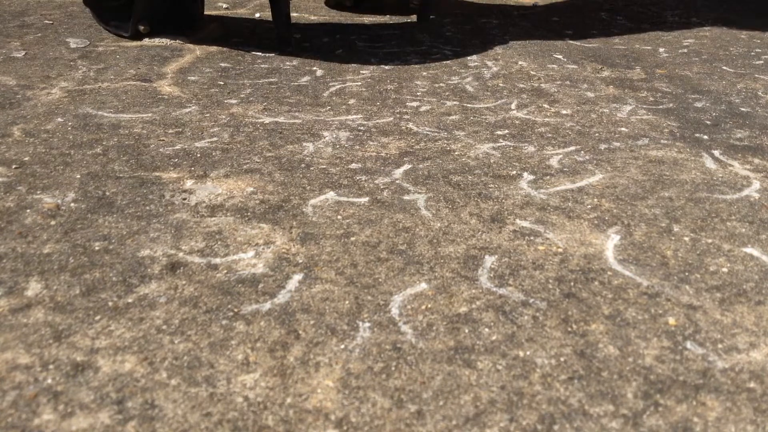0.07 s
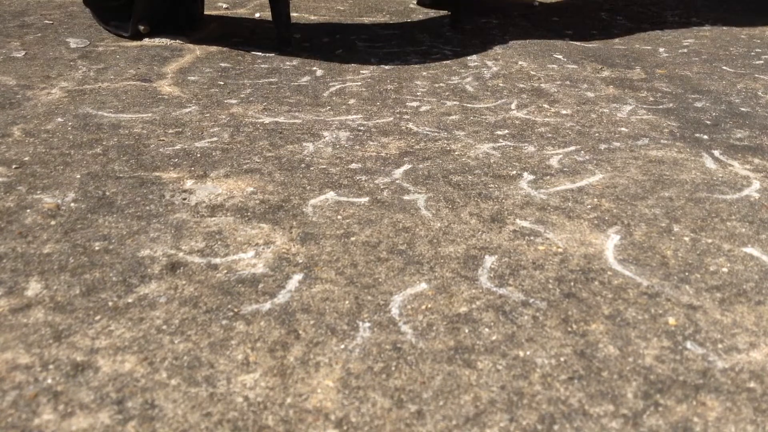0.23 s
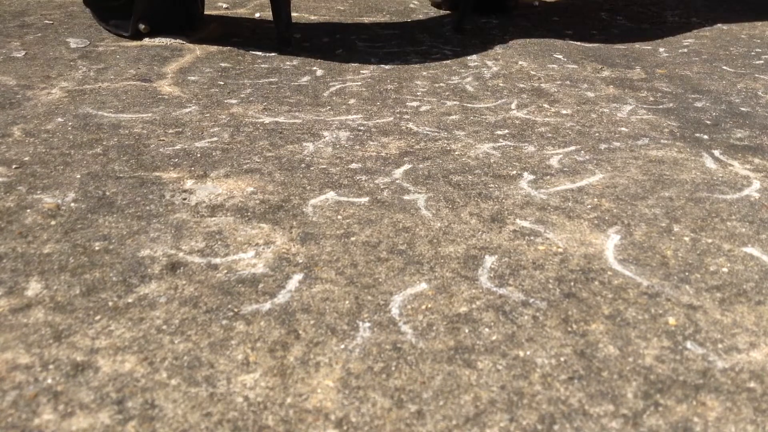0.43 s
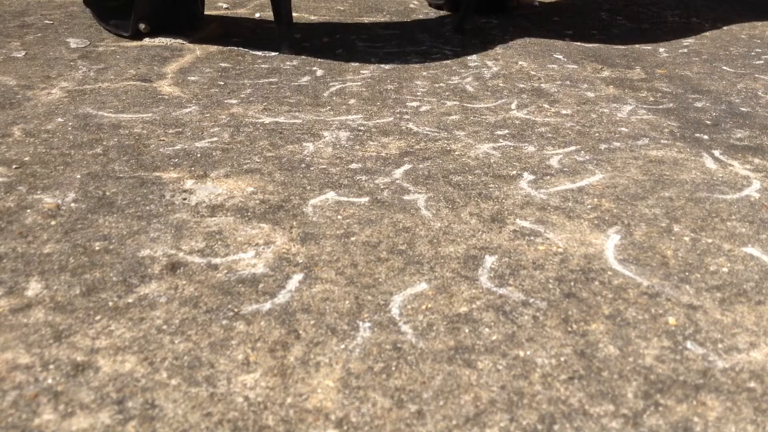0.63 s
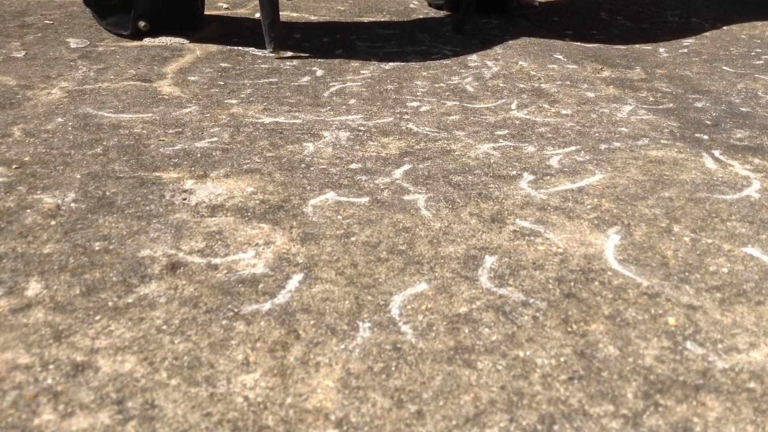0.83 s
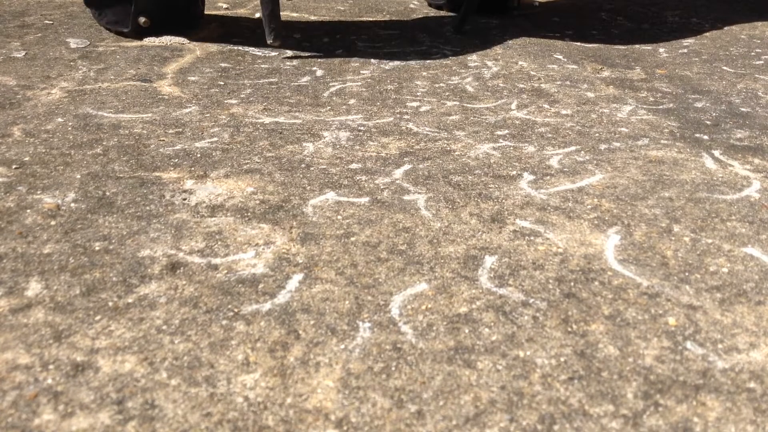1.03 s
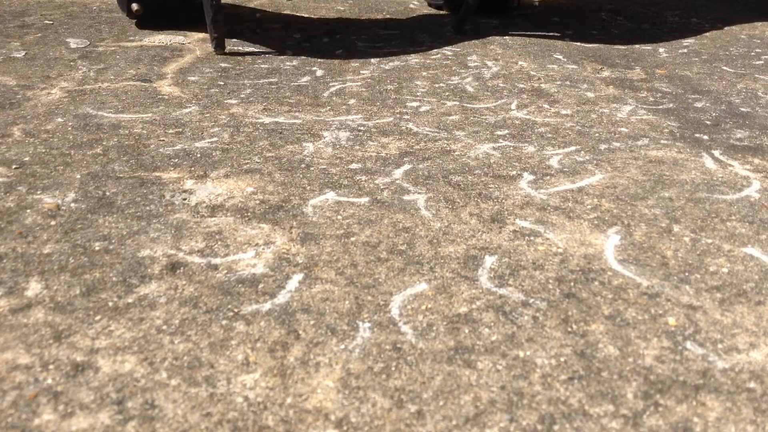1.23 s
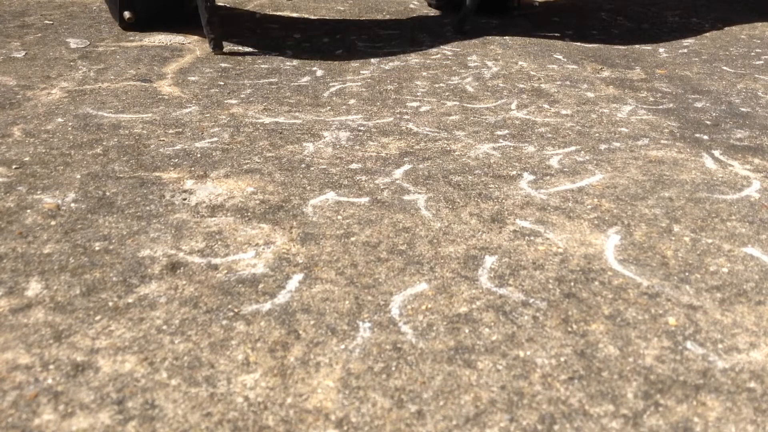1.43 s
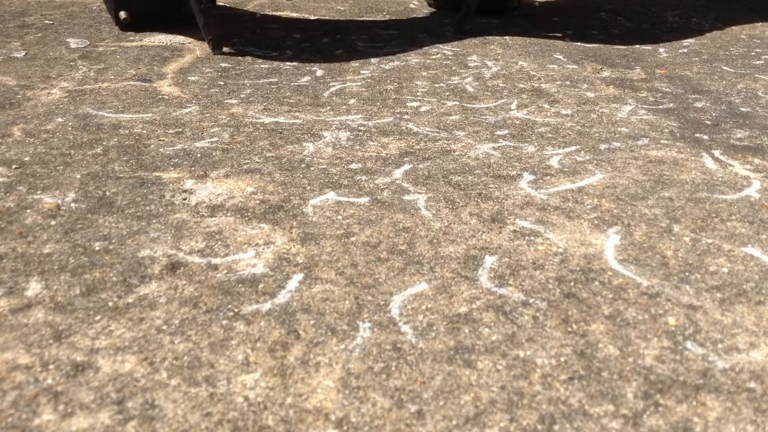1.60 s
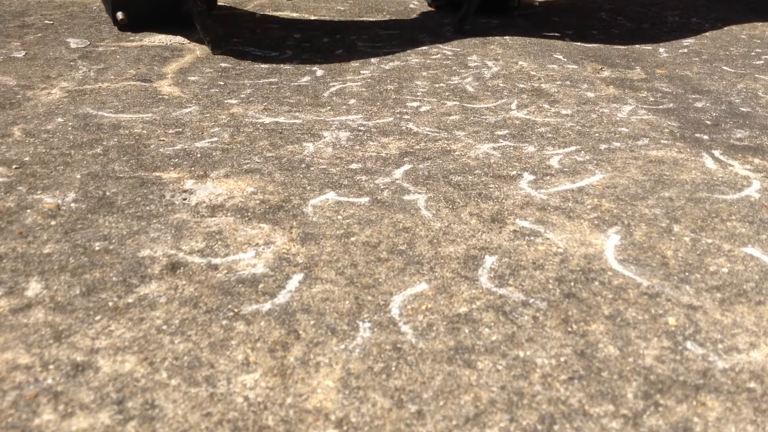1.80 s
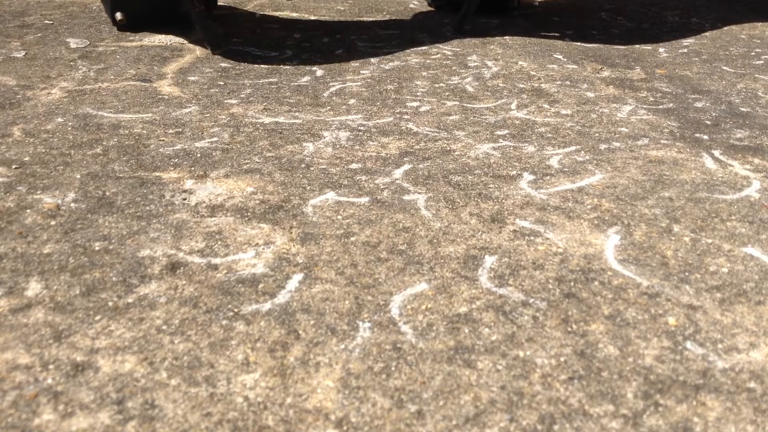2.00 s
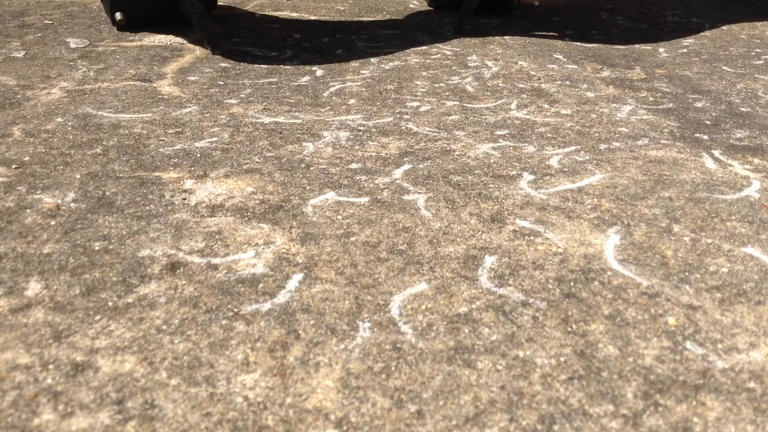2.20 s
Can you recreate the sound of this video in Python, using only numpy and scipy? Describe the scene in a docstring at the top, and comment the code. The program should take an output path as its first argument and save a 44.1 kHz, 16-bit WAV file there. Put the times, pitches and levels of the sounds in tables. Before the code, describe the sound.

Nailed boot heels scrape and crunch grit on rough stone, close by outdoors.

```python
"""Nailed boot heels on rough stone

Worn boot heels with bare nails shift on stone, outdoors and close by. A nail knocks, scrapes and
judders across the rock; then the heel comes down and grinds grit under it. Grains crack one by one,
the boots thud softly as the weight moves, and a low outdoor rumble lies beneath."""
import sys
import numpy as np
from scipy import signal
from scipy.fft import rfft, irfft, next_fast_len
from scipy.io import wavfile
from scipy.ndimage import uniform_filter1d

SR = 44100
rng = np.random.default_rng(int(sys.argv[2]) if len(sys.argv) > 2 else 0)


def generate_wav(sig):
    """Save sig (samples, or channels by samples) to the path in sys.argv[1] as 16-bit PCM at SR."""
    pcm = np.round(np.clip(np.atleast_2d(sig).T, -1, 1) * 32767).astype(np.int16)
    wavfile.write(sys.argv[1], SR, pcm)


N = 103635

# midrange rasp of a nail on stone (frequency [Hz], gain [dB])
RASP_EQ = [(200, -30), (470, -15), (830, 1), (1400, -8), (2400, 1), (3400, -0.5), (4400, 0.5), (6000, -1),
           (8000, -7), (10000, -12), (15000, -33)]
# bright hiss on top of the scrape (frequency [Hz], gain [dB])
HISS_EQ = [(1000, -9), (4000, -44), (7000, 7), (7700, -9), (8550, 9), (9800, -5.5), (11700, 4),
           (13200, 4.5), (14500, 5), (16000, 5.5)]
# hollow tone of the heel block (frequency [Hz], gain [dB])
HEEL_EQ = [(100, -38.5), (330, -23), (560, -2), (800, 0), (1050, 0), (1600, -7.5), (2200, -22.5),
           (5000, -63.5)]
# brittle top end of a chipping grain (frequency [Hz], gain [dB])
CHIP_EQ = [(300, -11), (1500, -22), (4000, 1), (7000, 14.5), (8600, 6.5), (10200, 3.5), (12000, 10.5),
           (15000, 0)]


def nail_skids():
    """The nail slips and bites: short swells of dense grains, ringing lower through the long slide."""
    # (peak time [s], 20 dB rise [s], 20 dB fall [s], rasp [dB], hiss [dB], ring pitch [Hz], ring [dB])
    skids = [(0.2447, .001, 0.014, -51, -40, 4200, -38), (0.4107, 0.0032, 0.0031, -23, -21.5, 3180, -36),
             (0.635, 0.0035, 0.0038, -21.5, -15, 2880, -23.5), (0.6654, 0.011, 0.0076, -18, -22, 2970, -24),
             (0.7056, 0.013, 0.014, -24, -25, 2660, -30.5), (.7360, 0.004, 0.017, -21, -23, 2420, -32),
             (0.743, .004, 0.016, -30, -35, 2300, -28.5), (.7630, 0.0069, 0.013, -34, -31, 2080, -35),
             (0.7704, 0.0034, 0.0081, -38, -23.5, 1980, -25.5),
             (0.7842, 0.0032, 0.017, -32.5, -40, 2160, -32.5),
             (1.3074, 0.0043, 0.0089, -27.5, -33, 3610, -25.5),
             (2.0690, 0.00067, 0.0032, -42, -50, 4070, -25.5)]
    overtone_ratio, overtone_db = 1.5, -9.5
    out, t = np.zeros(N), np.arange(N) / SR
    rasp, hiss = (steady(colour(grains(per_s=7500, spread_db=7), eq)) for eq in (RASP_EQ, HISS_EQ))
    for peak, rise, fall, rasp_db, hiss_db, ring_hz, ring_db in skids:
        swell = amp(-20 * np.maximum((peak - t) / rise, (t - peak) / fall).clip(0, 10))
        ring = nail_ring(ring_hz) + amp(overtone_db) * nail_ring(ring_hz * overtone_ratio)
        out += swell * (amp(rasp_db) * rasp + amp(hiss_db) * hiss + amp(ring_db) * ring)
    return out


def nail_ring(hz, width_hz=300):
    """One resonance of the nail, kept going by friction."""
    resonance = signal.iirpeak(hz, hz / width_hz, SR)
    return steady(signal.lfilter(*resonance, rng.standard_normal(N)))


def nail_drag():
    """Fine grains under the sliding nail: rasp, hiss and heel drone share one uneven pressure."""
    # fader moves of the scrape (time [s], rasp [dB], hiss [dB], heel drone [dB])
    faders = [(0, -66, -59, -62), (0.037, -54, -41, -64), (.08, -73, -71, -64.5), (.275, -80, -75, -60.5),
              (.285, -61, -51, -47), (0.398, -56.5, -60, -60), (.415, -41.5, -37, -39.5),
              (0.446, -42, -42.5, -43), (0.502, -58.5, -58, -56), (.628, -64, -63, -63),
              (.64, -38, -39, -38), (0.658, -39, -28.5, -39), (.688, -46.5, -44, -37.5),
              (.725, -43, -41, -45), (.757, -43, -53, -50), (0.794, -47, -61, -39), (.815, -55.5, -66, -52),
              (.89, -67.5, -64, -61), (1.02, -64, -64, -69), (1.055, -51.5, -57, -57),
              (1.085, -65.5, -75, -71), (1.297, -74, -87, -84), (1.317, -59, -77, -47),
              (1.358, -48.5, -44, -47), (1.417, -69.5, -77, -57.5), (1.453, -46, -49, -42.5),
              (1.485, -75, -72, -71), (1.55, -54.5, -66, -54), (1.558, -34, -41, -46),
              (1.585, -33.5, -51, -56), (1.62, -44.5, -46, -69), (1.682, -38, -43.5, -45),
              (1.741, -44.5, -50, -56), (1.77, -39, -42, -47), (1.805, -57.5, -57, -56.5),
              (1.88, -61.5, -61, -66), (1.94, -66, -68, -63), (2.005, -64, -66, -62),
              (2.012, -52, -68, -68), (2.05, -45, -44, -50), (2.09, -53, -54, -61),
              (2.13, -66.5, -74, -64.5), (2.28, -72, -70, -59.5), (2.35, -55.5, -55, -57.5)]
    pressure = flutter(depth_db=2.3, size=150)
    return sum(amp(db) * unit(pressure * colour(grains(per_s=6000, spread_db=6.5), eq))
               for db, eq in zip(automation(faders), (RASP_EQ, HISS_EQ, HEEL_EQ)))


def grit_cracks(size=900):
    """Each grain gives a dull crunch and a bright chip; big ones snap cleanly, small ones crumble."""
    # grains cracking under a nail (time [s], relative crunch level [dB], relative chip level [dB])
    cracks = [(0.0901, -49.5, -45.5), (0.282, -39.5, -45), (0.293, -43, -39.5), (0.3186, -48, -45),
              (0.3234, -43, -45), (0.3473, -47, -43), (0.4348, -34, -31), (0.4438, -40.5, -35),
              (0.462, -35, -44), (0.5363, -52, -43), (0.5601, -46, -41.5), (0.625, -48, -40),
              (0.6327, -31, -32), (0.636, -17.5, -24), (0.9414, -48.5, -42.5), (1.036, -49, -50),
              (1.0448, -37.5, -41), (1.1179, -47.5, -52), (1.4428, -35.5, -52), (1.4499, -28, -49),
              (1.4996, -50, -44), (1.5265, -40.5, -34.5), (1.5538, -29.5, -54), (1.5607, -31.5, -41),
              (1.5656, -29.5, -44), (1.5730, -20, -42), (1.5764, -28, -43), (1.594, -29.5, -31),
              (1.5972, -40, -43), (1.6293, -30, -30.5), (1.6348, -24.5, -56), (1.6374, -38, -42),
              (1.6494, -34, -46), (1.6764, -28, -49), (1.6832, -33.5, -44), (1.6855, -28.5, -46),
              (1.6874, -32.5, -47), (1.6999, -25.5, -50), (1.7139, -33, -37), (1.7481, -30, -35),
              (1.7558, -30, -35), (1.763, -25, -36), (1.7802, -33, -39), (1.8443, -43, -40.5),
              (1.876, -43, -40), (1.8814, -41.5, -41), (1.8875, -41, -43.5), (2.0062, -27.5, -45),
              (2.0338, -46, -34.5), (2.0356, -31.5, -33), (2.0685, -36.5, -36), (2.194, -53.5, -50.5),
              (2.3195, -47.5, -48.5)]
    # the duller part of a crack (frequency [Hz], gain [dB])
    crunch_eq = [(150, -15.5), (600, -7.5), (1500, -3.5), (2500, -1.5), (3600, 3.5), (5200, -4.5),
                 (7500, -10.5), (10000, -36), (15000, -58)]
    crunch_gain_db, chip_gain_db, pitch_scatter = 20.5, 19, 0.088
    snap_above_db, crumble_db_per_db, crumble_t60_s = -28, 0.4, 0.015
    out, t = np.zeros(N), np.arange(size) / SR
    for start, crunch_db, chip_db in cracks:
        crumble = amp(crumble_db_per_db * (snap_above_db - crunch_db))
        for eq, db in ((crunch_eq, crunch_db + crunch_gain_db), (CHIP_EQ, chip_db + chip_gain_db)):
            force = rng.standard_normal(size) * amp(-60 * t / crumble_t60_s)
            force *= crumble / np.linalg.norm(force)
            force[0] += rng.choice([-1, 1])  # the snap
            crack = colour(force, eq, ratio=np.exp(pitch_scatter * rng.standard_normal()))
            add(out, start, amp(db) * crack / np.linalg.norm(crack))
    return out


def heel_knocks(size=4000):
    """The heel block answers each blow with a short hollow ring and a noisy rattle."""
    # blows to the heel (time [s], level [dB], pitch [ratio], 60 dB decay [s])
    blows = [(0.2453, -23, 1.014, 0.025), (0.4107, -33.5, 1.1, 0.026), (0.429, -36.5, 1.18, 0.014),
             (.4345, -32, 0.97, 0.024), (.4435, -34.5, 1.1, 0.027), (0.4696, -31, 0.77, 0.022),
             (0.5822, -39, 0.83, 0.013), (.6350, -25, 0.836, 0.022), (0.6671, -27.5, 0.87, 0.047),
             (0.708, -27, 1.1, 0.032), (0.7417, -26, 1.02, 0.036), (0.7697, -27.5, 1.06, 0.038),
             (1.3008, -20.5, 1, 0.031), (1.3069, -26.5, 0.98, 0.048), (1.331, -38, 0.97, 0.073),
             (1.354, -28.5, 1.04, 0.021), (1.4315, -34.5, 0.69, 0.014), (1.4492, -36.5, 0.67, 0.044),
             (1.5727, -29, 1.94, 0.0083), (1.7475, -28.5, 1.35, 0.0099), (2.0688, -41.5, 0.92, 0.017)]
    # modes of the block (base frequency [Hz], relative level [dB], decay [ratio to the blow's])
    modes = [(370, -22.5, 0.58), (499, -8, 1.46), (690, -7, 1.4), (803, 3, 0.93), (931, -11, 2.2),
             (1190, -6.5, 0.84), (1520, -10.5, 1.3)]
    ring_db, rattle_db, attack_s = 1, -4.5, 0.00019
    out, t = np.zeros(N), np.arange(size) / SR
    attack = 1 - np.exp(-t / attack_s)
    for start, db, pitch, t60 in blows:
        ring = np.zeros(size)
        for hz, mode_db, decay_ratio in modes:
            decay = amp(mode_db + rng.normal(0, 1) - 60 * t / (t60 * decay_ratio))
            ring += decay * np.sin(2 * np.pi * hz * pitch * t)
        rattle = steady(colour(rng.standard_normal(size), HEEL_EQ, pitch)) * amp(-60 * t / t60)
        add(out, start, amp(db) * attack * (amp(ring_db) * ring + amp(rattle_db) * rattle))
    return out


def boot_thuds(size=6000):
    """Each shift of weight gives a few soft low cycles that start tight and sag in pitch."""
    # shifts of weight (time [s], relative level [dB], settled pitch [Hz], 60 dB decay [s])
    thuds = [(0.116, -23.5, 142, 0.03), (.125, -30.5, 246, 0.04), (0.186, -19.5, 190, 0.021),
             (.222, -34.5, 219, 0.036), (0.975, -24.5, 185.6, 0.057), (1.013, -37, 141, 0.062),
             (1.082, -36, 171, 0.068), (1.340, -28, 184, 0.062), (1.455, -38, 162, 0.068),
             (1.809, -31.5, 172, 0.062)]
    attack_s, pitch_lift, relax_s = 0.0023, 0.41, 0.003
    out, t = np.zeros(N), np.arange(size) / SR
    attack = (1 - np.exp(-t / attack_s)) ** 2
    for start, db, hz, t60 in thuds:
        cycles = np.cumsum(hz * (1 + pitch_lift * np.exp(-t / relax_s))) / SR
        add(out, start, 2 * amp(db - 60 * t / t60) * attack * np.sin(2 * np.pi * cycles))
    return out


def nail_sing(start_s=0.28, end_s=0.42, level_db=-62.5):
    """A thin, chattering ring while the nail barely touches the stone."""
    t = np.arange(N) / SR
    touch = uniform_filter1d(1. * ((t > start_s) & (t < end_s)), size=500)
    chatter = unit(flutter(depth_db=10, size=200))
    return amp(level_db) * touch * chatter * nail_ring(hz=6660)


def sand_ticks(level_db=-73):
    """Sparse faint ticks of sand under the soles."""
    return amp(level_db) * unit(colour(grains(per_s=97, spread_db=7), CHIP_EQ))


def boot_body(scrape, t60_s=0.013, tail_db=-7.5, size=1200):
    """Many short resonances of nail and boot ripple the spectrum of the scraping."""
    response = rng.standard_normal(size) * amp(-60 * np.arange(size) / SR / t60_s)
    response *= amp(tail_db) / np.linalg.norm(response)
    response[0] = 1  # the direct sound
    return signal.fftconvolve(scrape, response / np.linalg.norm(response))[:N]


def echo(x, predelay_s=0.006):
    """Scatter from the surroundings: a short tail that lingers longest in the mids."""
    # length of the tail (frequency [Hz], 60 dB decay [s])
    decay_times = [(200, 0.18), (900, 0.28), (3000, 0.17), (12000, 0.092)]
    hz, t, bands = signal.stft(rng.standard_normal(SR // 2), SR, nperseg=256)
    decay = amp(-60 * t / along(decay_times, hz)[:, None])
    _, tail = signal.istft(bands * decay, SR, nperseg=256)
    out = np.zeros(N)
    add(out, predelay_s, signal.fftconvolve(x, tail / np.linalg.norm(tail)))
    return out


def outdoor_air(hiss_db=-67.5):
    """A bed of slowly swelling low rumble and faint steady hiss."""
    # tone of the rumble (frequency [Hz], gain [dB])
    rumble_eq = [(25, -18), (60, -13.5), (110, -1.5), (175, 0.5), (300, -7.5), (700, -14.5), (1300, -19),
                 (2500, -38), (8000, -64)]
    # fader moves of the rumble (time [s], level [dB])
    rumble_fader = [(0, -53), (.4, -55.5), (.85, -52), (1.1, -50.5), (1.45, -49.5), (1.7, -54),
                    (1.97, -53.5), (2.15, -52), (2.35, -61)]
    # tone of the hiss (frequency [Hz], gain [dB])
    air_eq = [(500, 1), (3000, 1), (7000, -6.5), (15000, -7)]
    rumble_db, = automation(rumble_fader)
    rumble, hiss = (unit(colour(rng.standard_normal(N), eq, size=8192)) for eq in (rumble_eq, air_eq))
    return amp(rumble_db) * rumble + amp(hiss_db) * hiss


def grains(per_s, spread_db):
    """A stream of tiny impacts of uneven size."""
    hits = rng.random(N) < per_s / SR
    polarity = rng.choice([-1, 1], N)
    return hits * polarity * amp(spread_db * np.clip(rng.standard_normal(N), -2, 2))


def flutter(depth_db, size):
    """A randomly wavering gain, smoothed over size samples."""
    return amp(depth_db * unit(uniform_filter1d(rng.standard_normal(N), size)))


def colour(x, eq, ratio=1, size=1024):
    """Minimum-phase filter following an EQ curve, its pitch scaled by ratio."""
    hz = np.fft.rfftfreq(size, 1 / SR)
    cepstrum = irfft(np.log(amp(along(eq, hz / ratio))))
    cepstrum[1:size // 2] *= 2  # folding makes the filter causal
    cepstrum[size // 2 + 1:] = 0
    return signal.fftconvolve(x, irfft(np.exp(rfft(cepstrum))))[:len(x)]


def steady(x, size=300):
    """Even out a texture to rms 1 over a few milliseconds."""
    return x / np.sqrt(np.abs(uniform_filter1d(x ** 2, size)) + 1e-12)


def amp(db):
    """Decibels to gain."""
    return 10 ** (np.asarray(db) / 20)


def unit(x):
    """Scale to rms 1."""
    return x / np.sqrt(np.mean(x ** 2) + 1e-20)


def along(points, hz):
    """Read (frequency [Hz], value) points on a log frequency axis."""
    freqs, values = np.transpose(points)
    return np.interp(np.log(hz + 1), np.log(freqs + 1), values)


def automation(rows):
    """One curve, sample by sample, for each column after the time."""
    times, *columns = np.transpose(rows)
    return [np.interp(np.arange(N) / SR, times, column) for column in columns]


def add(track, start_s, sound):
    """Mix a sound in at start_s."""
    i = max(0, round(start_s * SR))
    track[i:i + len(sound)] += sound[:max(0, len(track) - i)]


def scene(echo_db=-16.5):
    """The boots, their weak echo and the open air, in mono."""
    boots = grit_cracks() + boot_body(nail_skids() + nail_drag() + sand_ticks())
    boots += nail_sing() + heel_knocks() + boot_thuds()
    return (boots + amp(echo_db) * echo(boots) + outdoor_air())[None]


def record(dry):
    """The recorder thins the deep bass and keeps nothing above its band limit."""
    low_cut_hz, top_hz = 119, 15450
    size = next_fast_len(N + SR // 2)
    thinned = signal.sosfilt(signal.butter(1, low_cut_hz, "highpass", fs=SR, output="sos"), dry)
    high_cut = 1 / (1 + (np.fft.rfftfreq(size, 1 / SR) / top_hz) ** 130)
    return irfft(rfft(thinned, size) * high_cut, size)[..., :N]


dry = scene()
out = record(dry)
generate_wav(out)
```